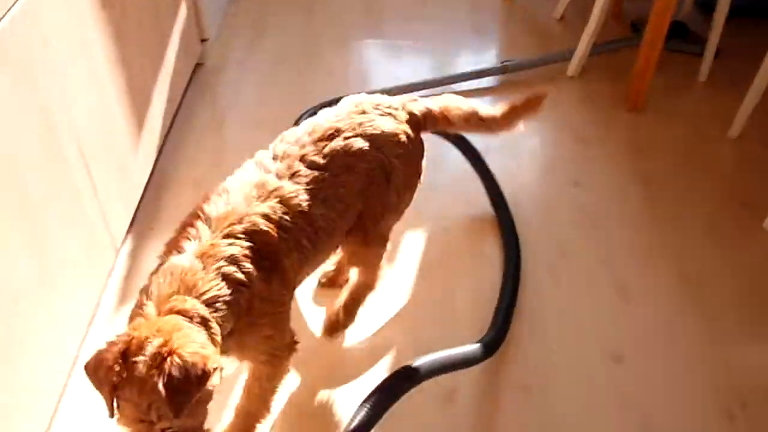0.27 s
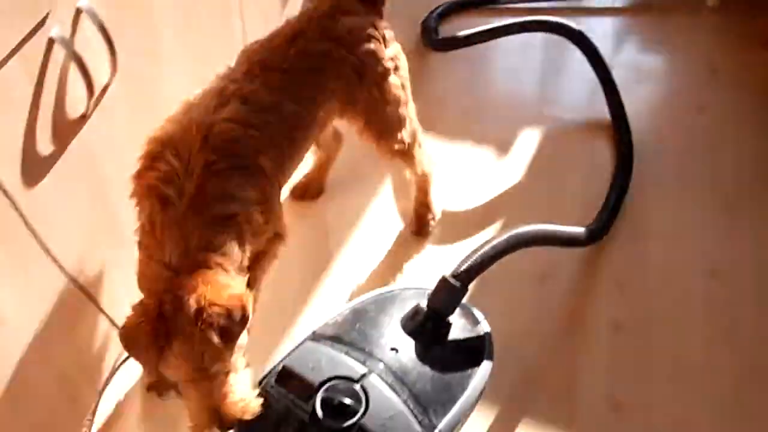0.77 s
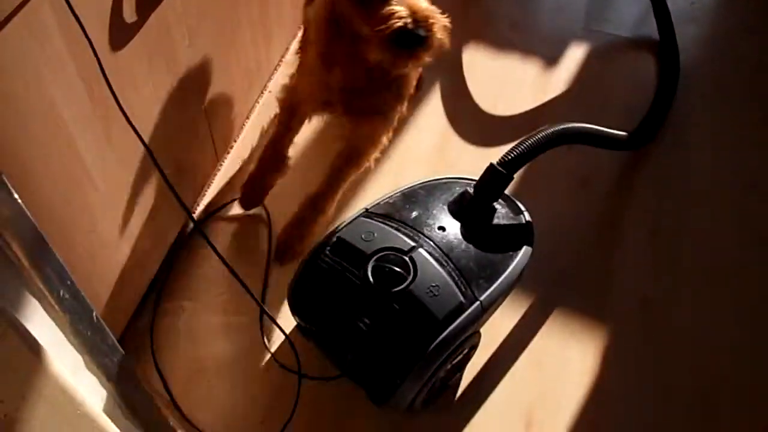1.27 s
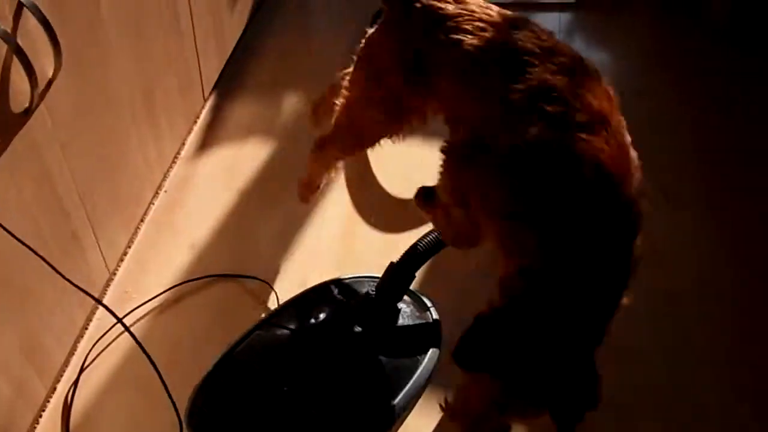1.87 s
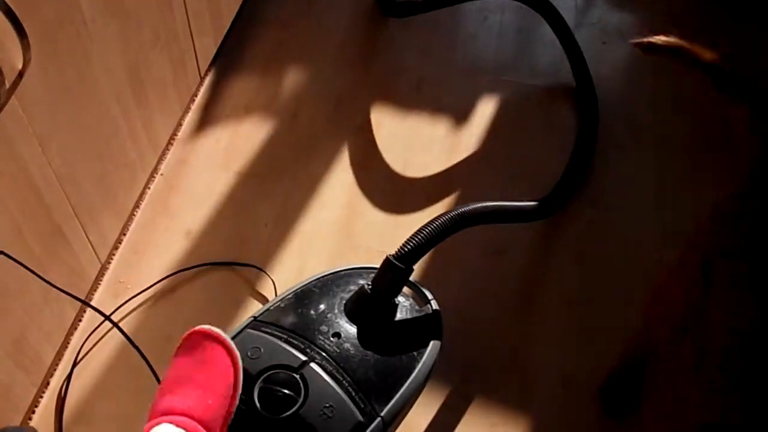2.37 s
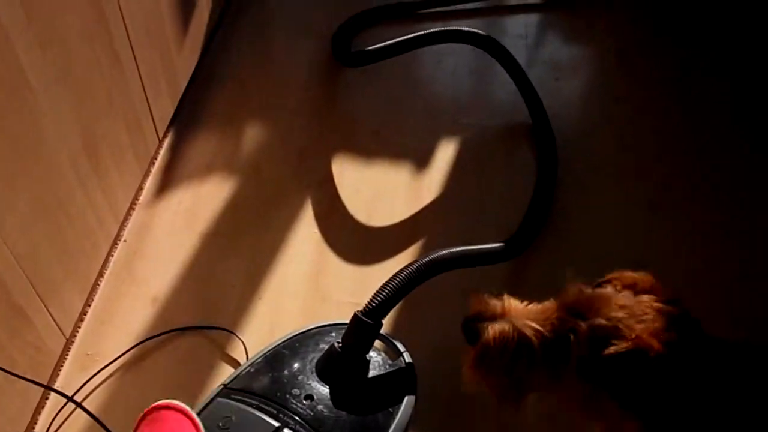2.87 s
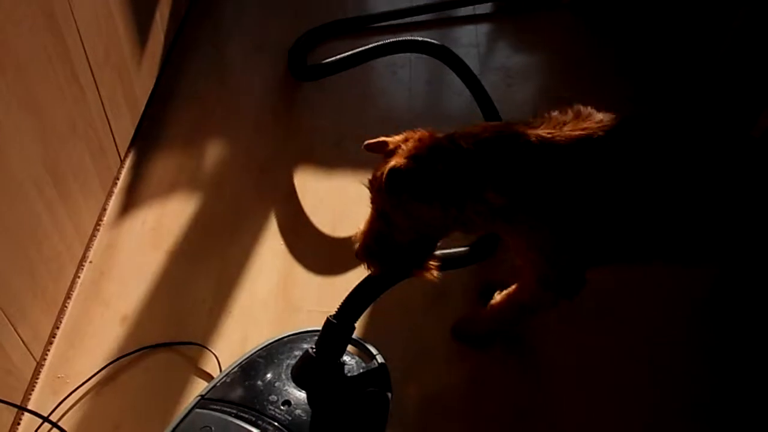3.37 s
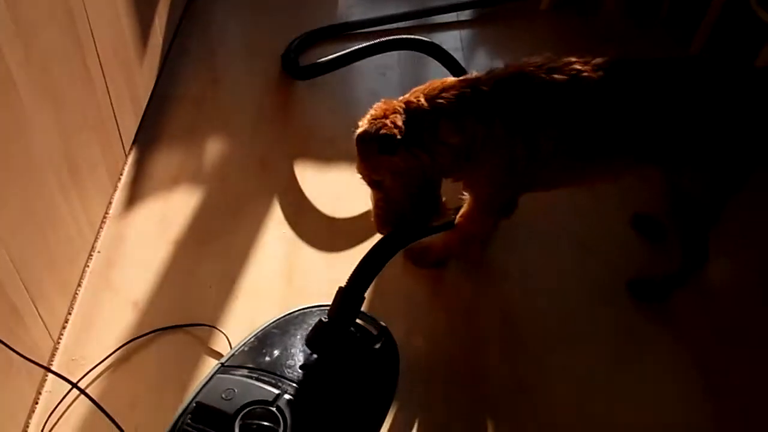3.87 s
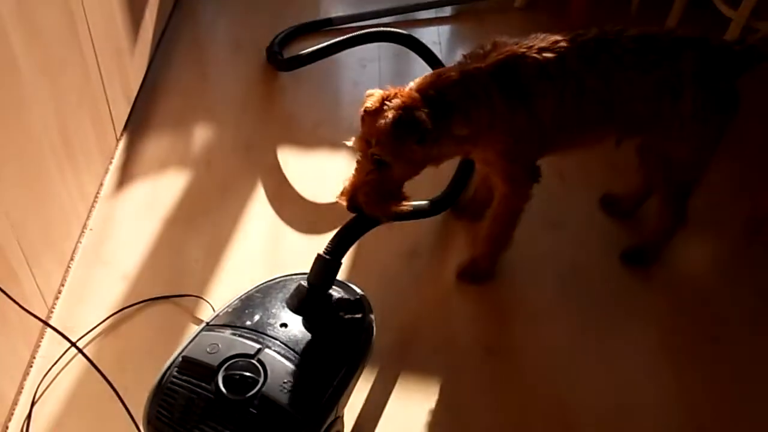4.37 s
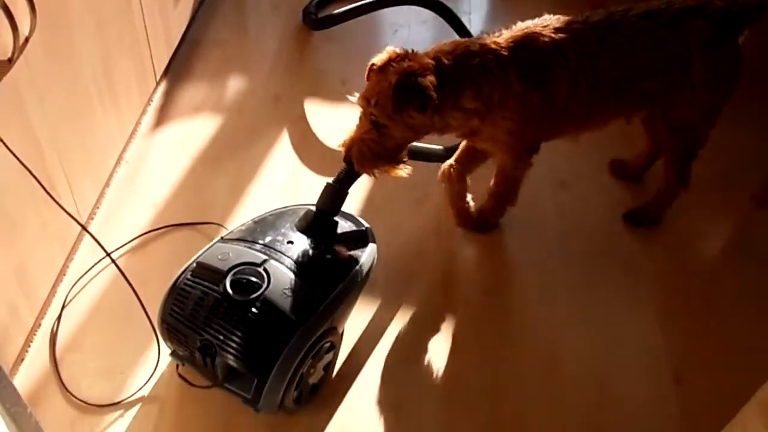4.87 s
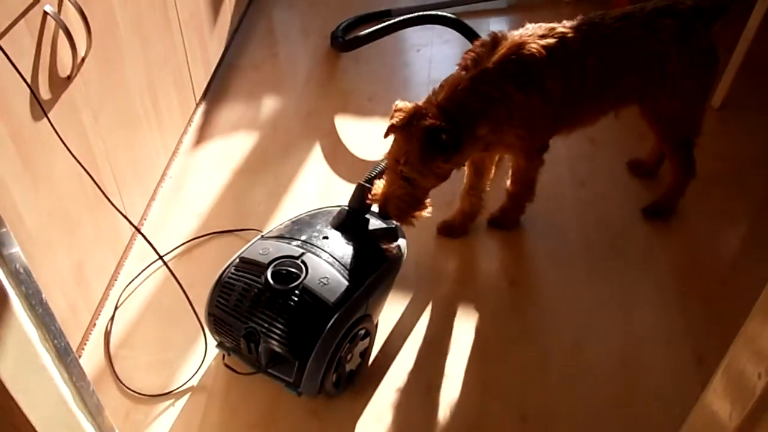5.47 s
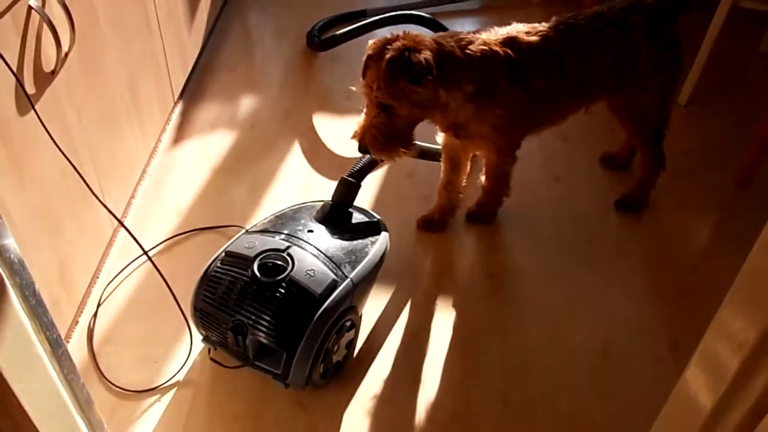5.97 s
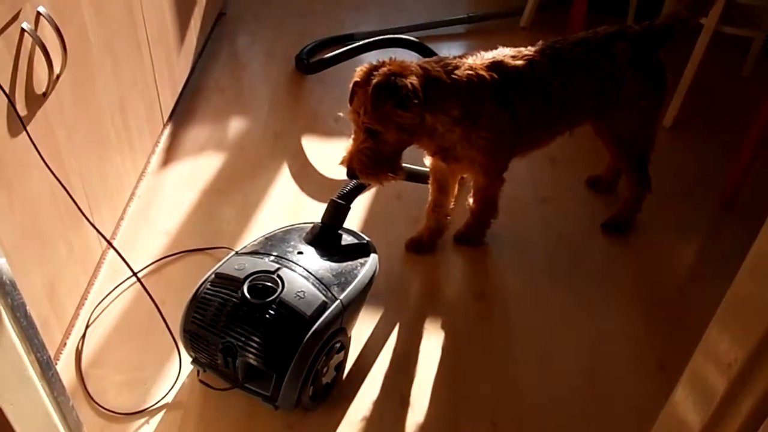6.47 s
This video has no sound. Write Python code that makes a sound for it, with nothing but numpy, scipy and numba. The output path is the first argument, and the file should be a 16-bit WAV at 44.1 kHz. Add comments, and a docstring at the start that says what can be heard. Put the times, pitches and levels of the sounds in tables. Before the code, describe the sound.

A vacuum cleaner revs up, clicks off and winds down with a falling whine, while a dog woofs, barks once and growls.

```python
"""A canister vacuum cleaner runs up on a hard kitchen floor as a terrier beside it growls and woofs.
Air rushes through the fan, shaft and blades whine. At 2.6 s a foot knocks the switch off and the motor
coasts down. The dog barks once, overloading the phone, and growls again at 3.5 s: vocal-fold pulses and
breath ring its throat and mouth in the lively room. From 4.2 s the brushes squeal on the slowing motor."""
import sys
import numpy as np
from scipy import signal
from scipy.io import wavfile
from scipy.ndimage import uniform_filter1d
from numba import njit

SR = 44100
rng = np.random.default_rng(int(sys.argv[2]) if len(sys.argv) > 2 else 0)


def dump_mix(stems):
    """Bounce the given channels to the path in sys.argv[1] as a 16-bit WAV at rate SR."""
    frames = np.atleast_2d(stems).T  # one column per channel
    limited = np.clip(frames, -1, 1)  # hard clip at full scale
    pcm = np.round(limited * 32767).astype(np.int16)
    wavfile.write(sys.argv[1], SR, pcm)


N = 295911
T = np.arange(N) / SR

# Floor, cupboard and wall echoes. Each row: delay in ms, relative left gain, relative right gain.
ECHO_TAPS = [(.4, 0.19, -0.046), (1.6, -0.028, -0.026), (2.9, -0.12, 0.12), (5.6, -0.034, -0.14),
             (8.7, 0.47, -0.078), (13.1, 0.012, 0.38)]

# Dog calls. Each row: time in seconds, pitch in Hz, level in dB, roughness (clipped to 0-1).
WOOF_CONTOUR = [(0, 118.7, -31.5, 1.02), (.16, 130.7, -31.5, .75), (.18, 209, -27.5, 0.57),
                (.205, 221.7, -24.5, .46), (.3, 222.8, -25.5, .4), (.35, 215.9, -29.5, 0.67),
                (.42, 220.6, -43, 0.53)]
BARK_CONTOUR = [(2.781, 100.7, -50.5, 0.84), (2.88, 119.5, -37, .72), (2.951, 189.9, -31, 0.59),
                (2.985, 284.6, -25, .22), (3.015, 343.9, -15, .14), (3.028, 367, -11.5, 0.23),
                (3.035, 510.2, -7, 0.41), (3.092, 525, -11, 0.44), (3.15, 522, -21.5, .5),
                (3.24, 514, -36, 0.64)]
GROWL_CONTOUR = [(3.46, 170, -47, 0.77), (3.5, 169.3, -34, 0.76), (3.57, 174.4, -28.5, 0.76),
                 (3.66, 175.3, -23.5, 0.69), (3.762, 169.5, -29, .72), (3.82, 165.6, -27, .72),
                 (3.901, 152.8, -42.5, 0.96)]
# Jaw travel per call. Each row: throat shut, throat open, mouth shut, mouth open in Hz, pure tone in dB.
CALL_JAWS = [(406, 431, 890, 964, -21), (430, 582, 850, 1040, -26.5), (520, 720, 960, 940, -24)]
# Vocal tract per call. Each row: throat width, mouth width, upper mouth centre and width in Hz,
# then mouth, upper mouth, chest, hiss and left minus right in dB.
CALL_TRACTS = [(261.6, 260, 1870, 220, -3.5, -6, -9, -33, -6),
               (278, 170, 1680, 450, 2, 2, -12.5, -13, -7.5),
               (233, 97, 2070, 230, -7, -8.5, -11.5, -32, -6.5)]
# Throbs of the woof's pure tone. Each row: start in seconds, length in seconds, lift in dB.
WOOF_THROBS = [(.203, .046, 31), (.256, .048, 23), (.311, .024, 24)]

# Plastic switch modes. Each row: frequency in Hz, relative level in dB, T60 in seconds.
KNOCK_MODES = [(867, 5, 0.053), (1550, -5.5, 0.044), (2940, -4.5, 0.029)]
# Brush squeals. Each row: start and end in seconds, start pitch, end pitch and width in Hz,
# level in dB, left minus right in dB.
BRUSH_BANDS = [(1.7, 2.6, 10000, 9940, 1000, -33, 3), (4.2, 4.8, 7100, 6800, 600, -43.5, 4),
               (4.601, 5.1, 9900, 8770, 800, -47.5, 10), (4.897, 6.205, 8360, 7550, 550, -49.5, 1),
               (5.549, 6.142, 5540, 5270, 446, -51.5, -17), (5.201, 6.298, 6310, 5910, 450, -52, -15.5),
               (6.004, 6.746, 4840, 4520, 351.6, -52, -14), (6.046, 6.78, 7400, 5750, 500, -53, -5),
               (6.116, 6.416, 9800, 9020, 200.5, -58, 8), (6.5, 6.748, 10920, 10030, 200, -60.5, 13),
               (6.624, 6.783, 8150, 7940, 61, -51, 1), (6.617, 6.78, 4090, 3940, 100, -53, -2)]
# Shaft tone and blade-pass harmonics 1, 2 and 4. Each row: time in seconds, level in dB.
SHAFT_TONE_DB = [(.75, -68), (1.1, -43.5), (1.3, -53), (2.6, -59), (4.13, -75), (4.25, -58.5), (4.5, -57.5),
                 (5.05, -67), (5.2, -59.5), (5.9, -72.5), (6.2, -61), (6.45, -68), (6.6, -84)]
BLADE_1_DB = [(.3, -48), (.72, -40), (.85, -28.5), (1.0, -30), (1.1, -24), (1.17, -37), (1.6, -35),
              (1.82, -29), (2.3, -32), (2.45, -38), (2.62, -41), (2.72, -33), (3.0, -32), (3.15, -43),
              (3.5, -45)]
BLADE_2_DB = [(3.9, -60), (3.99, -47), (4.13, -55), (4.28, -41), (4.68, -47), (4.89, -37.5), (5.06, -47),
              (5.18, -41), (5.37, -45), (5.55, -37), (5.68, -38), (5.9, -60), (6.05, -53), (6.15, -78)]
BLADE_4_DB = [(5.1, -78), (5.3, -58), (5.55, -44.5), (5.75, -52.5), (6.0, -64.5)]
# Shell and hose resonances. Each row: centre in Hz, width in Hz, gain in dB.
CASING_MODES = [(1625, 64, -1), (2110, 100, -7.5), (2680, 200, -9.5), (3010, 88, -11), (3690, 56, -7.5),
                (3935, 112, -13.5)]
# Air rush against speed. Each row: shaft rate in Hz, level in dB, bass lift in dB, treble lift in dB.
RUSH_BY_SPEED = [(102, -57, 5.5, -2), (168.7, -50.5, 3.5, 0), (233, -42, 0.5, 2), (310, -38, 3, 3.5),
                 (399.5, -33, 3.5, 3), (548, -24.5, -1.5, -0.7), (582, -22.5, -1.5, 0.5),
                 (690, -21.5, 0, -0.5)]
# Rush spectra, fast and slow shaft. Each row: frequency in Hz, relative density in dB.
FAST_RUSH_DB = [(59, -67), (100, -38), (298, -16), (386, -20), (673, -12), (1020, -11), (1640, -9),
                (1850, -10), (2920, 0.5), (5740, -6), (10000, -16), (11500, -29), (15000, -57.5),
                (22000, -120)]
SLOW_RUSH_DB = [(59, -53.5), (100, -30.5), (203, -18), (295, -24), (1170, -5.5), (2420, -1.5), (2830, -1),
                (4630, -7), (8520, -5), (11000, -23), (14300, -50.5), (22000, -120)]
# Stereo width of the rush. Each row: frequency in Hz, left-right correlation.
RUSH_CORRELATION = [(60, 1), (130, 1), (270, 1), (560, 0.93), (1190, 0.25), (2510, 0.2), (5300, -0.19),
                    (11200, -0.2)]
# Balance of the rush. Each row: frequency in Hz, left minus right in steps of LEAN_STEP_DB.
RUSH_LEAN = [(60, 6), (110, -13.5), (190, 0), (340, -2), (610, 0.5), (1100, 3.5), (1960, 3.5), (3500, -6.5),
             (6250, 0), (11200, 15.5)]

ROOM_T60_S, ROOM_DAMPING, ROOM_SEND_DB, RUMBLE_DB = 0.45, 0.32, -14, -69.5
POWER_OFF_S, KNOCK_S, KNOCK_DB = 2.616, 2.64, -15.5
BLADES, RUSH_PAN_DB, LEAN_STEP_DB = 9, -3.4, 0.74


def undb(db):
    return 10 ** (np.asarray(db) / 20)


def unit(x):
    return x / np.sqrt(np.mean(x ** 2))


def curves(rows, **edge):
    """Timed rows to one curve per column."""
    times_s, *columns = np.transpose(rows)
    return [np.interp(T, times_s, column, **edge) for column in columns]


def at(rows, hz, column=1):
    """Table lookup on a log-frequency axis."""
    rows = np.array(rows)
    return np.interp(np.log(hz), np.log(rows[:, 0]), rows[:, column])


def pan(x, db):
    return x * undb(np.array([db / 2, -db / 2]).reshape(2, -1))


def walk(rate_hz):
    """Smoothed random steps, spread near 1."""
    held = np.repeat(rng.standard_normal(int(T[-1] * rate_hz) + 2), 16)
    smooth = uniform_filter1d(uniform_filter1d(held, size=16), size=16)
    return 1.3 * np.interp(T * rate_hz * 16, np.arange(len(held)), smooth)


@njit
def svf(x, hz, width_hz):
    """Movable band-pass, gain 1 at the centre."""
    y, band_state, low_state = np.empty(len(x)), 0., 0.
    for i in range(len(x)):
        g, k = np.tan(np.pi * hz[i] / SR), width_hz / hz[i]
        v = (band_state + g * (x[i] + 1e-18 - low_state)) / (1 + g * (g + k))
        band_state = 2 * v - band_state
        low_state += 2 * g * v
        y[i] = k * v
    return y


def band(x, hz, width_hz):
    """Two band-passes in series, output at unit RMS."""
    hz = hz + np.zeros(N)
    return unit(svf(svf(x, hz, float(width_hz)), hz, float(width_hz)))


def house_rumble():
    """Faint low noise of the house."""
    return undb(RUMBLE_DB) * np.array([band(rng.standard_normal(N), 46.8, 160) for _ in range(2)])


@njit
def room_reverb(x):
    """Wall-to-wall reflections: eight coupled delay lines, duller each round."""
    lags = np.array([613, 787, 941, 1123, 1327, 1531, 1783, 2053])
    gain = 10 ** (-3 * lags / SR / ROOM_T60_S)
    line, damped, out = np.zeros((8, 4096)), np.zeros(8), np.zeros((2, len(x)))
    for i in range(len(x)):
        for k in range(8):
            damped[k] += (1 - ROOM_DAMPING) * (gain[k] * line[k, (i - lags[k]) & 4095] - damped[k])
            out[k % 2, i] += damped[k]
        line[:, i & 4095] = x[i] + 1e-18 + damped - damped.sum() / 4
    return out


def early_echoes(x, echo_db):
    """Near surfaces return the sound once, combing each channel differently."""
    out, mono = x, x.mean(axis=0)
    for delay_ms, *gains in ECHO_TAPS:
        delayed = np.concatenate([np.zeros(int(delay_ms * SR / 1000)), mono])[:N]
        out = out + undb(echo_db) * np.outer(gains, delayed)
    return out * undb(-1)


@njit
def vocal_folds(hz, rough, chance, jitter, shimmer):
    """One pulse per closure; rough cycles vary in length and strength."""
    pulses, phases = np.zeros(len(hz) + 1), np.empty(len(hz))
    phase, cycle = 0., 0
    for i in range(len(hz)):
        step = hz[i] * np.exp(jitter * rough[i] * chance[cycle, 0]) / SR
        phase += step
        if phase >= 1:
            phase, cycle = phase - 1, cycle + 1
            size = np.exp(shimmer * rough[i] * min(chance[cycle, 1], 1.5)) * np.sqrt(SR / hz[i])
            pulses[i] += size * phase / step
            pulses[i + 1] += size * (1 - phase / step)
        phases[i] = phase
    return pulses[:-1], phases


def throb_db(edge_s=.006, sag_db_per_s=90):
    """Each throb of the woof opens fast, sags and shuts."""
    out = 0
    for start_s, length_s, lift_db in WOOF_THROBS:
        t = T - start_s
        gate = np.clip(t / edge_s, 0, 1) * np.clip((length_s - t) / edge_s, 0, 1)
        out = out + gate * (lift_db - sag_db_per_s * t)
    return out


def dog_call(contour, jaw, tract, harmonic):
    """Fold pulses and breath ring throat, mouth and chest; one harmonic stands out as a pure tone."""
    hz, db, rough = curves(contour)
    rough = np.clip(rough, 0, 1)
    throat_shut_hz, throat_open_hz, mouth_shut_hz, mouth_open_hz, tone_db = jaw
    throat_width_hz, mouth_width_hz, upper_hz, upper_width_hz = tract[:4]
    mouth_db, upper_db, chest_db, hiss_db, pan_db = tract[4:]
    jaw_drop = np.maximum.accumulate(db - db[0]) / np.max(db - db[0])  # opens with effort, stays open
    throat_hz = throat_shut_hz + (throat_open_hz - throat_shut_hz) * jaw_drop
    mouth_hz = mouth_shut_hz + (mouth_open_hz - mouth_shut_hz) * jaw_drop
    tone_db = tone_db + throb_db()
    effort_db = db + tone_db.clip(0)
    opening_db = 0.28 * (effort_db - effort_db.max())  # louder: mouth wider
    chance = np.clip(rng.standard_normal((N // 40, 2)), -2, 2)
    pulses, phase = vocal_folds(hz, rough, chance, jitter=.25, shimmer=.45)
    breath = 1.93 * rng.standard_normal(N) * np.exp(-phase / .5)
    source = (1.2 - rough) * pulses + rough * breath
    voice = (band(source, throat_hz, throat_width_hz)
             + undb(mouth_db) * band(source, mouth_hz, mouth_width_hz)
             + undb(upper_db + opening_db) * band(source, upper_hz, upper_width_hz)
             + undb(chest_db) * band(source, 210, 194)
             + undb(hiss_db) * band(source, 3206, 3500))
    tone = np.sqrt(2) * np.sin(2 * np.pi * harmonic * np.cumsum(hz) / SR)
    voice += tone * undb(tone_db) * 2 * (1 - rough)
    gate = (T >= contour[0][0]) & (T < contour[-1][0])
    return pan(voice * undb(db) * gate, pan_db)


def switch_knock():
    """A foot presses the plastic switch; the loose pedal chatters as it seats."""
    t = np.maximum(T - KNOCK_S, 0)
    ring = sum(undb(db - 60 * t / t60_s) * np.sin(2 * np.pi * hz * t) for hz, db, t60_s in KNOCK_MODES)
    chatter = 1 + 0.95 * walk(600)
    attack = 1 - np.exp(-t / 0.0013)
    return undb(KNOCK_DB) * ring * chatter * attack


def brush_squeals():
    """Narrow bands of rubbing noise swell, sink in pitch and fade."""
    out = 0
    for start_s, end_s, start_hz, end_hz, width_hz, db, pan_db in BRUSH_BANDS:
        progress = np.clip((T - start_s) / (end_s - start_s), 0, 1)
        hz = start_hz + (end_hz - start_hz) * progress
        pair = np.array([band(rng.standard_normal(N), hz, width_hz) for _ in range(2)])
        swell = np.sqrt(np.abs(np.sin(np.pi * progress))) * (progress < 1)
        out = out + pan(pair * swell * undb(db + 2.2 * walk(16)), pan_db)
    return out


def shaft_speed_hz(full_hz=712.4, ease_hz=24.8, drag_per_turn=.001158, friction_hz_per_s=31.7):
    """Run-up easing towards full speed; after power-off, df/dt = -drag f^2 - friction."""
    ramp_hz = 425.5 + 122.1 * T - 75.3 * np.exp(-T / .383)
    powered_hz = -ease_hz * np.logaddexp(-ramp_hz / ease_hz, -full_hz / ease_hz)  # soft minimum
    balance_hz = np.sqrt(friction_hz_per_s / drag_per_turn)  # drag equals friction
    off_angle = np.arctan(np.interp(POWER_OFF_S, T, powered_hz) / balance_hz)
    angle = off_angle - drag_per_turn * balance_hz * np.maximum(T - POWER_OFF_S, 0)
    return np.where(T < POWER_OFF_S, powered_hz, balance_hz * np.tan(angle))


def motor_whine(shaft_hz):
    """Shaft-rate and blade-pass tones, wavering between left and right."""
    shaft_rad = 2 * np.pi * np.cumsum(shaft_hz * (1 + 0.00083 * walk(40))) / SR
    contours = SHAFT_TONE_DB, BLADE_1_DB, BLADE_2_DB, BLADE_4_DB
    out = 0
    for order, contour in zip((1, BLADES, 2 * BLADES, 4 * BLADES), contours):
        db = curves(contour, left=-90, right=-90)[0]
        spread = min(order / BLADES, 1)
        skew_rad = spread * (.5 + .25 * walk(3)) * np.array([[1], [-1]])
        tone = np.sqrt(2) * np.sin(order * shaft_rad + skew_rad) * undb(db + 3 * walk(16))
        out = out + pan(tone, spread * 2.5 * walk(4) - 2.5)
    return out


def casing(x):
    """Plastic shell and hose ring with the air, lifting narrow bands."""
    return x + sum(undb(db) * np.array([svf(channel, np.full(N, float(hz)), float(width_hz))
                                        for channel in x]) for hz, width_hz, db in CASING_MODES)


def air_rush(shaft_hz):
    """Air through the fan: third-octave noise whose level and colour follow the shaft."""
    level_db, bass_db, treble_db = (at(RUSH_BY_SPEED, shaft_hz, column) for column in (1, 2, 3))
    treble_db -= 6.5 * np.exp(-T / 0.45)  # treble fills in late
    fast = np.clip(np.log(shaft_hz / 190) / np.log(560 / 190), 0, 1)
    swell_db = .5 * walk(9)
    out, reference_power = 0, 0
    for hz in 63 * 2 ** np.arange(0, 7.7, 1 / 3):
        third = signal.butter(2, [hz / 2 ** (1 / 6), hz * 2 ** (1 / 6)], "band", fs=SR, output="sos")
        mid, side = (unit(signal.sosfilt(third, rng.standard_normal(N))) for _ in range(2))
        correlation = np.clip(at(RUSH_CORRELATION, hz), -.98, .98)
        pair = np.sqrt(1 + correlation) * mid + np.sqrt(1 - correlation) * side * np.array([[1], [-1]])
        db = fast * at(FAST_RUSH_DB, hz) + (1 - fast) * at(SLOW_RUSH_DB, hz) + 10 * np.log10(hz)
        db += bass_db * np.clip(np.log2(2000 / hz), 0, 1)
        db += treble_db * np.clip(np.log2(hz / 5000), 0, 1)
        if 2300 < hz < 6000:  # level_db refers to this range
            reference_power += undb(db) ** 2
        wobble_db = swell_db + 1.1 * walk(9)
        out = out + pan(pair * undb(db + wobble_db), at(RUSH_LEAN, hz) * LEAN_STEP_DB)
    return pan(out * undb(level_db) / np.sqrt(reference_power), RUSH_PAN_DB)


def scene():
    shaft_hz = shaft_speed_hz()
    vacuum = casing(air_rush(shaft_hz)) + brush_squeals() + switch_knock()
    vacuum = early_echoes(vacuum, echo_db=-2) + motor_whine(shaft_hz)
    contours, harmonics = (WOOF_CONTOUR, BARK_CONTOUR, GROWL_CONTOUR), (2, 1, 1)
    calls = sum(map(dog_call, contours, CALL_JAWS, CALL_TRACTS, harmonics))
    sources = vacuum + early_echoes(calls, echo_db=0.5)
    return sources + room_reverb(undb(ROOM_SEND_DB) * sources.mean(axis=0)) + house_rumble()


def record(dry):
    """The phone thins the bass, overloads on the bark and cuts the top."""
    low_cut = signal.butter(1, 60, "high", fs=SR, output="sos")
    high_cut = signal.ellip(12, .3, 70, 11500, fs=SR, output="sos")
    clipped = np.clip(signal.sosfilt(low_cut, dry), -1, 1)
    return signal.sosfilt(high_cut, clipped)


dry = scene()
out = record(dry)
dump_mix(out)
```